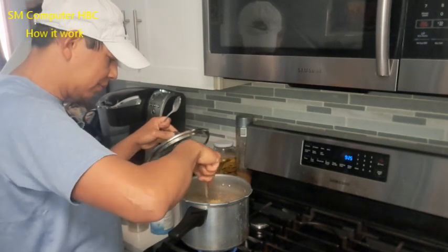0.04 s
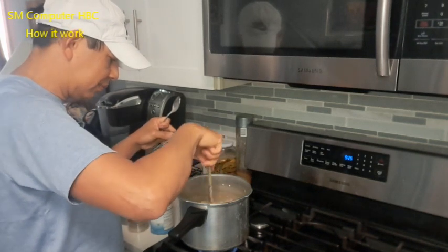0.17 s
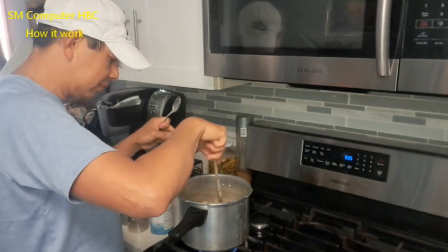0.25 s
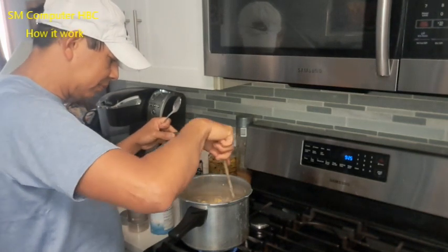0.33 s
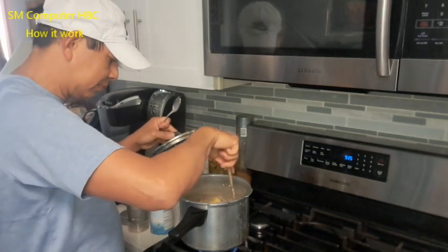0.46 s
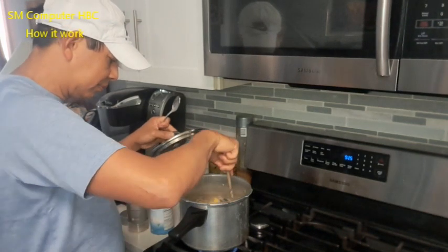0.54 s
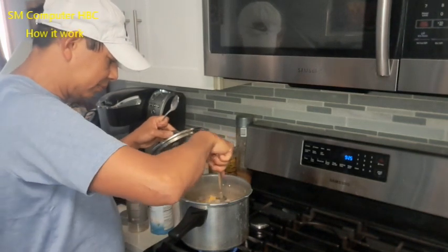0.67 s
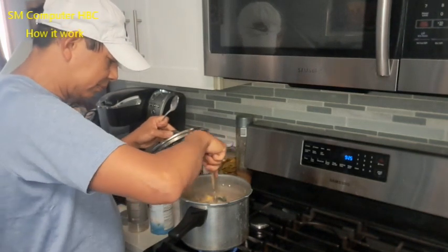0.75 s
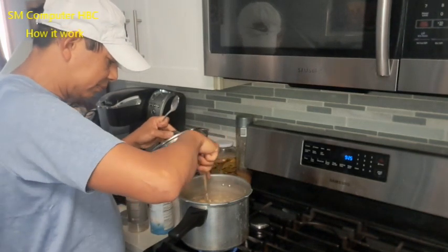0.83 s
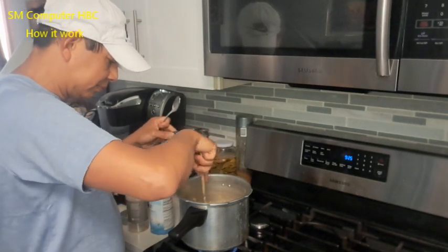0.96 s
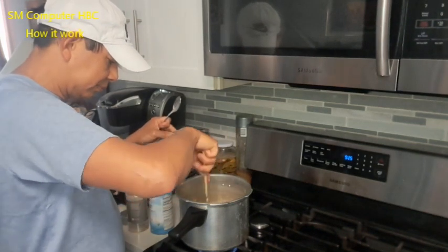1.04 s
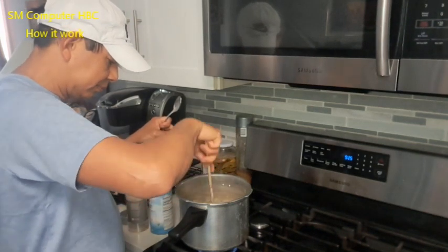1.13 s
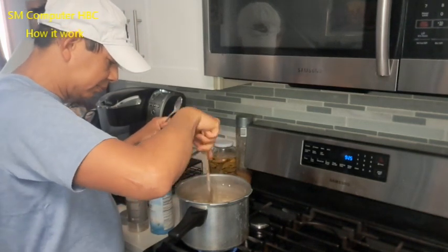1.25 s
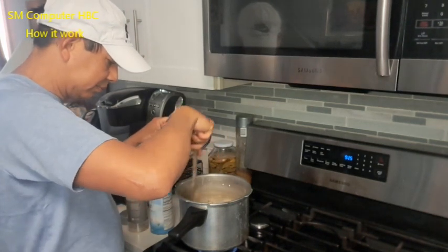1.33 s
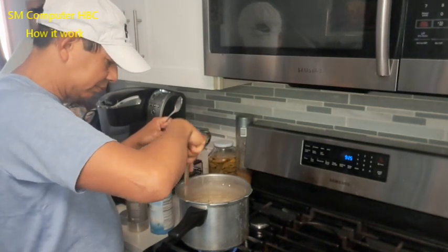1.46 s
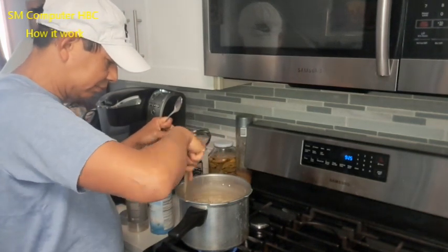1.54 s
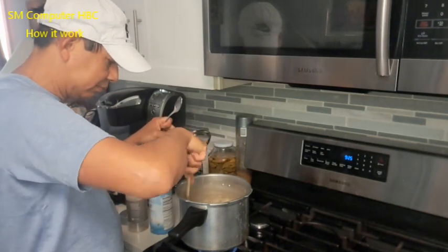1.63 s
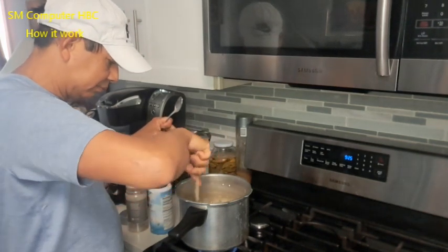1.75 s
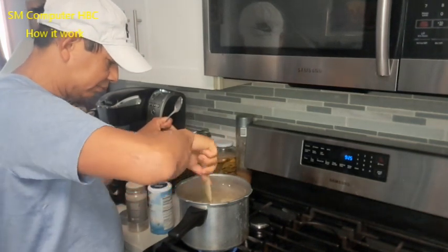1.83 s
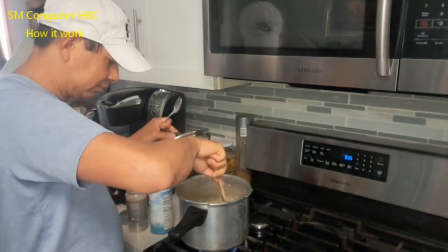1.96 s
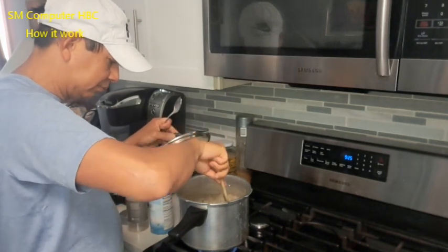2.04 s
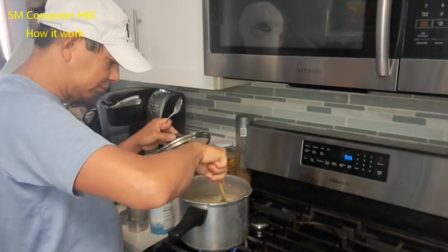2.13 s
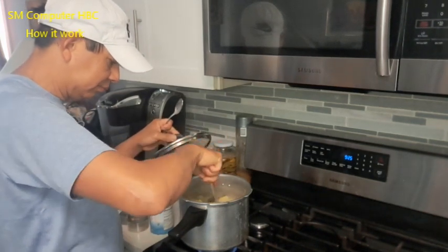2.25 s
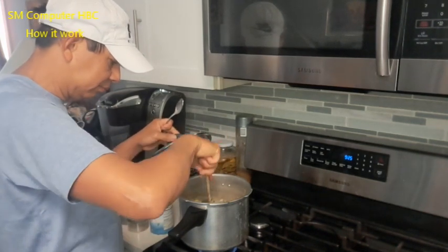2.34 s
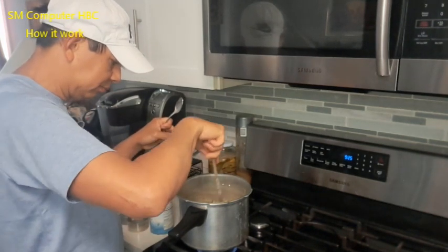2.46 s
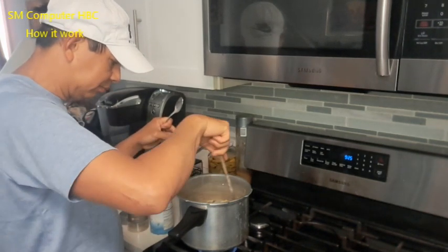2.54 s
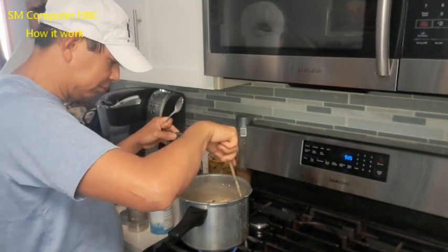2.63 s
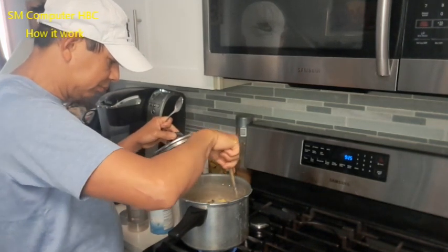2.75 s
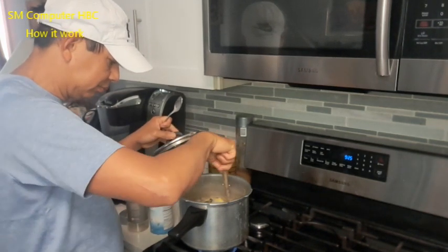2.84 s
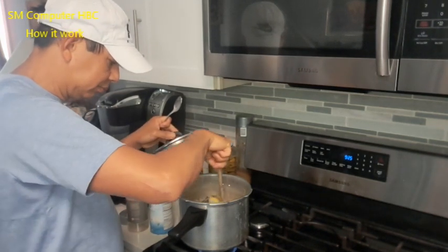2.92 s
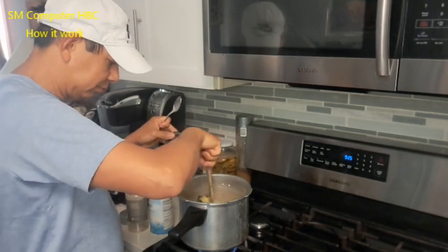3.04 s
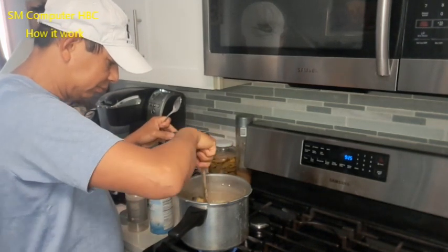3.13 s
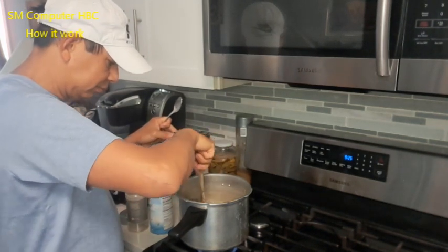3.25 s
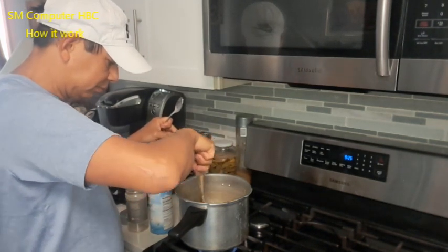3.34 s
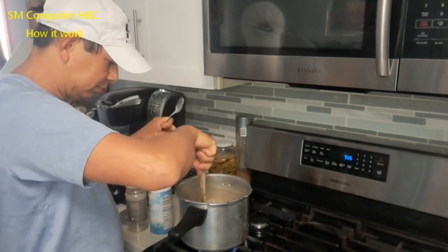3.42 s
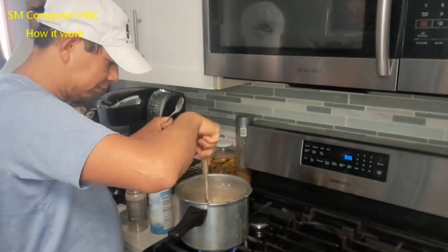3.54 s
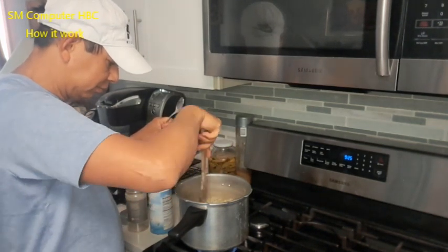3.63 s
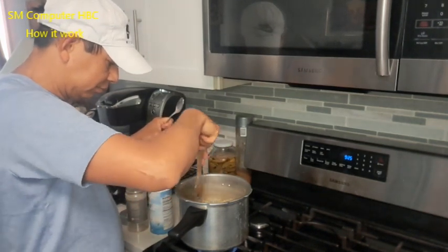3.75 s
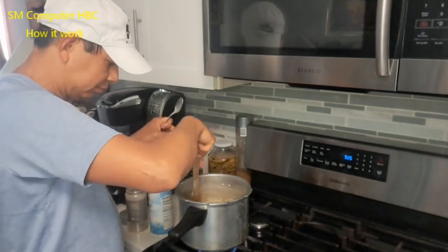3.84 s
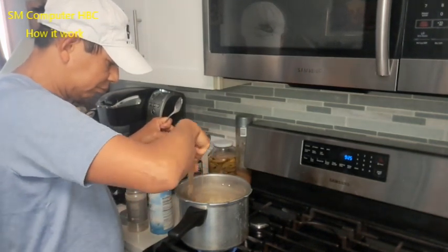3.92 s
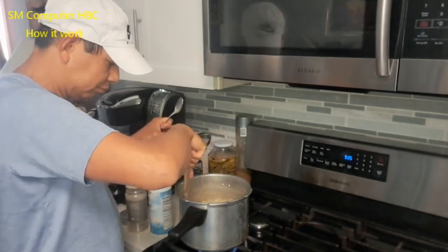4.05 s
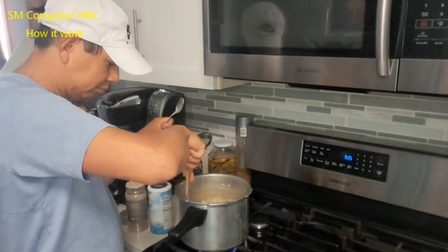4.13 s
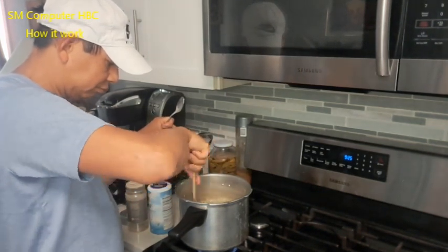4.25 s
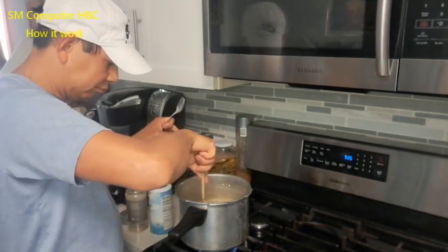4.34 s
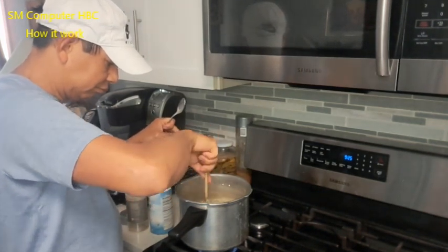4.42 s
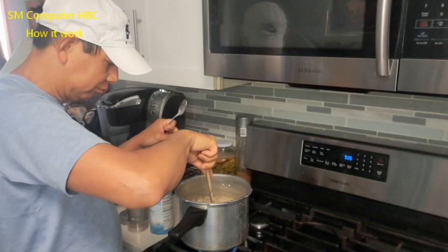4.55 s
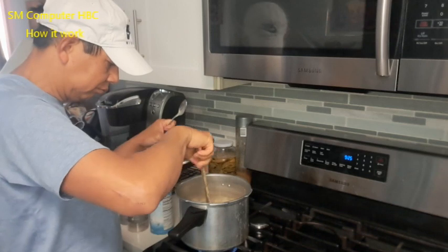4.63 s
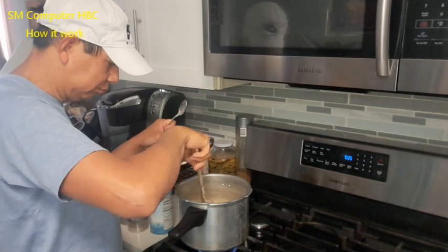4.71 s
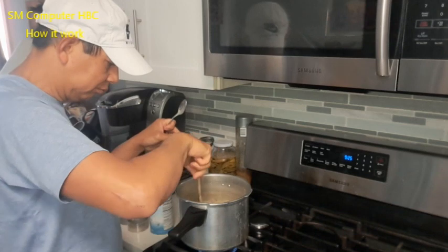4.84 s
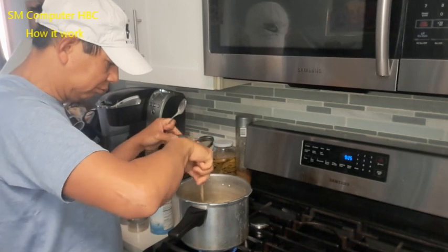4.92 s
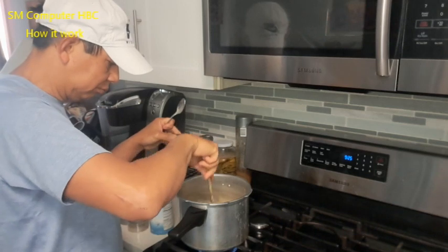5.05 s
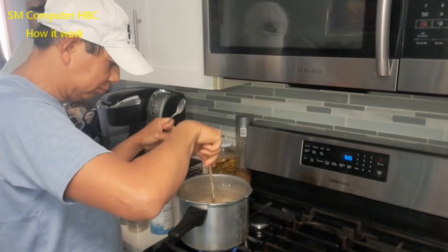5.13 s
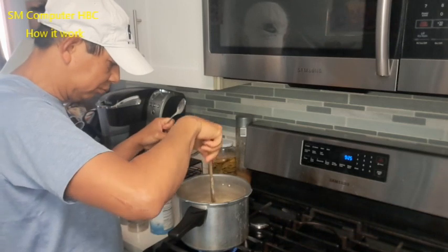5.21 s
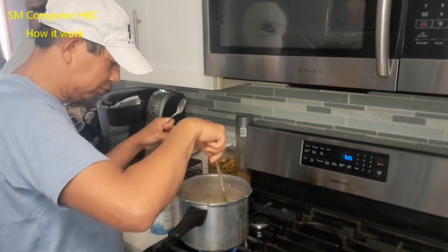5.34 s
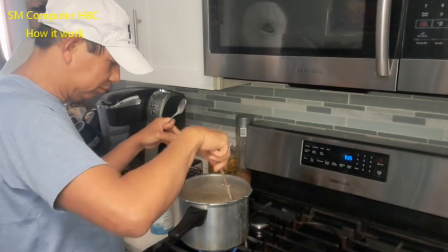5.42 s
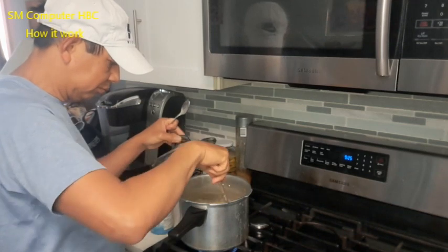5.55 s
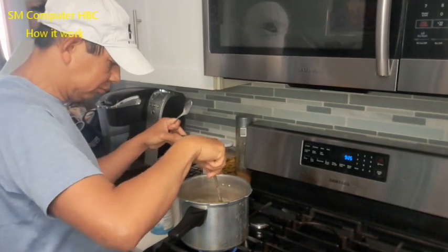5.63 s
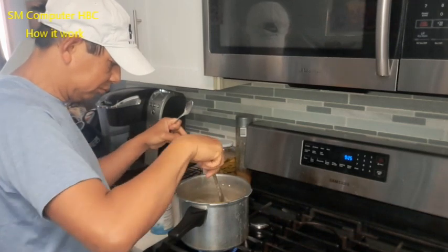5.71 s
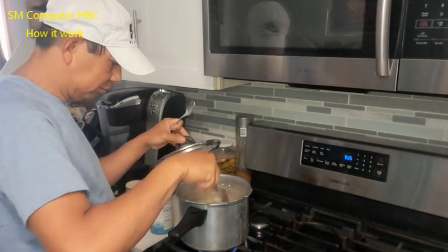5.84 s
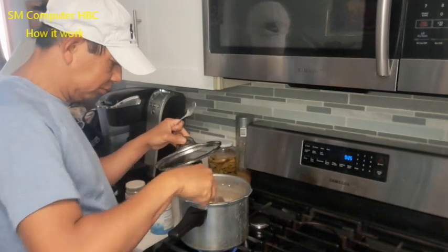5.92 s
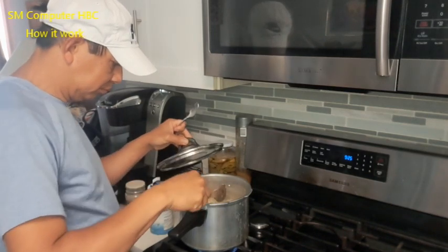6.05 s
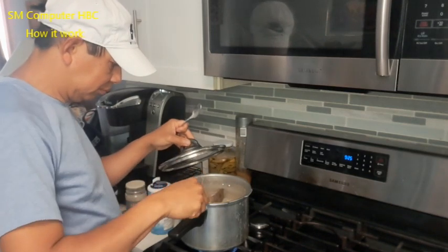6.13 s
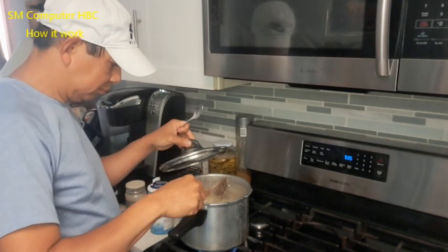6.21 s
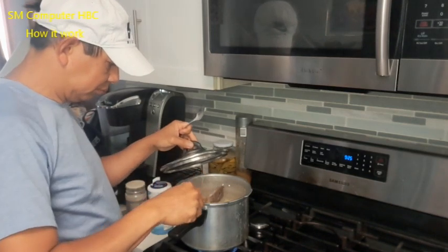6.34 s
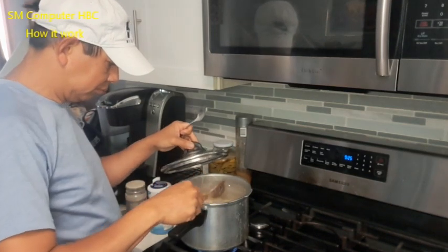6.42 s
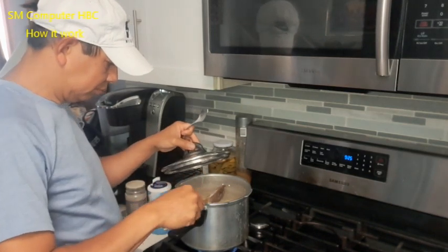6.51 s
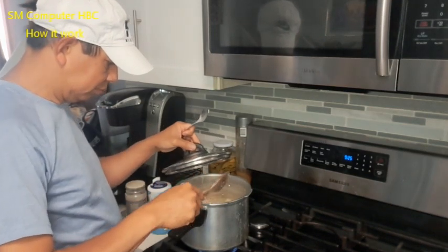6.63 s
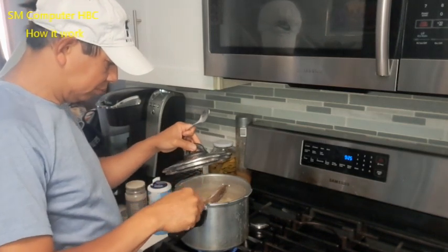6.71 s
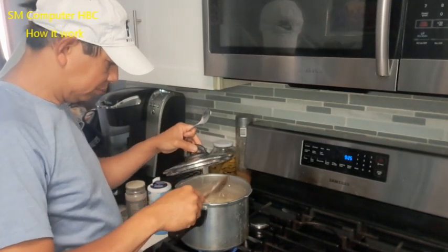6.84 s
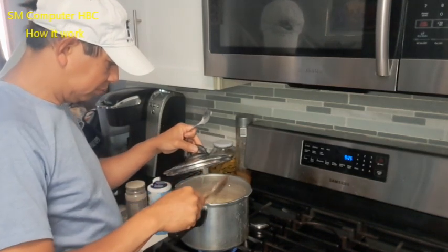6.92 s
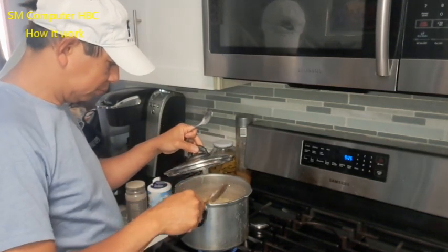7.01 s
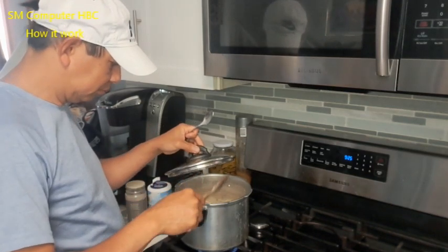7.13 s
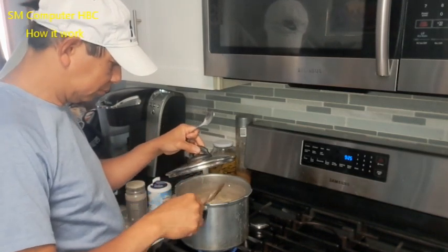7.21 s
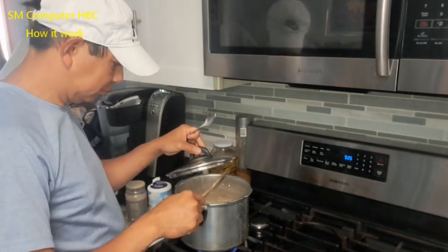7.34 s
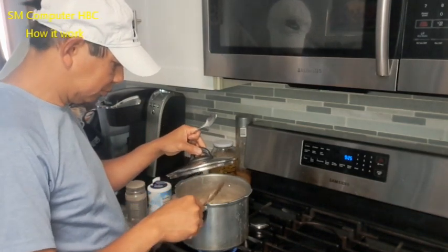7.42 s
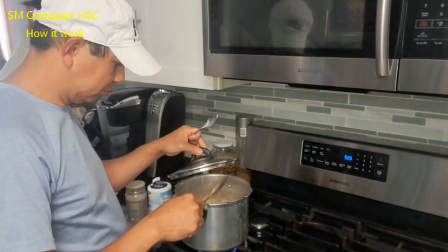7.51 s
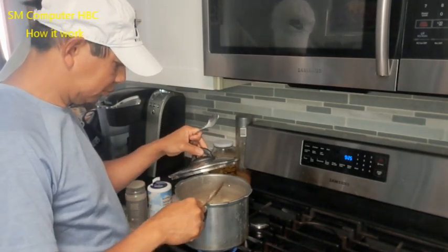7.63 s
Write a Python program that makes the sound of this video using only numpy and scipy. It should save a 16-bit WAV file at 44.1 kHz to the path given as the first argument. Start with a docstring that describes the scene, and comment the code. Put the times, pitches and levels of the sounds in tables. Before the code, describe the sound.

A wooden spoon stirs thick stew in a steel saucepan with soft plops and wet squelches, then knocks the rim in a steady run of hollow booming clacks.

```python
"""Thick stew, stirred with a wooden spoon in a steel saucepan on a gas stove, plops, pops and squelches.
Its air pockets are damped resonators of rising pitch; its clicks and wet smacks are shaped noise.
The spoon drags on the bottom and knocks the rim: decaying modes and noise bursts form boom and clack.
Small-kitchen reflections and steady rumble and hiss surround this; the right channel is inverted."""
import sys
import numpy as np
from scipy import signal
from scipy.fft import rfft, irfft
from scipy.io import wavfile
from scipy.ndimage import uniform_filter1d

SR = 44100
rng = np.random.default_rng(int(sys.argv[2]) if len(sys.argv) > 2 else 0)


def to_wav(sig):
    """Store sig (one row per channel, or 1-D mono) as 16-bit WAV at the path in sys.argv[1].

    Samples outside -1..1 are clipped; the rate is SR.
    """
    pcm = np.clip(np.atleast_2d(sig), -1, 1) * 32767
    pcm = np.round(pcm).astype(np.int16)
    wavfile.write(sys.argv[1], SR, pcm.T)  # frames by channels


N = 338238

# Event and spectrum levels are relative: the sources trim or normalise them.
# large air pockets opening behind the spoon: [t/s, level/dB]
LARGE_POCKETS = [(.277, -30.5), (.411, -31.5), (.651, -33.5), (1.01, -28), (1.218, -32), (1.447, -23.5),
                 (1.481, -26.5), (1.837, -29.5), (2.047, -32.5), (2.351, -30.5), (2.546, -32),
                 (2.969, -25.5), (3.06, -30), (3.21, -33.5), (3.834, -24), (4.016, -27.5), (4.395, -31.5),
                 (4.643, -32), (5.082, -27.5), (5.177, -31), (5.503, -37.5), (5.781, -29), (6.333, -30.5),
                 (6.444, -28), (6.703, -30), (6.743, -25), (7.215, -33)]
# small air pockets bursting at the surface: [t/s, level/dB]
SMALL_POCKETS = [(.052, -42.5), (.183, -44), (.281, -52), (.424, -35.5), (.454, -43), (1.319, -40.5),
                 (1.76, -38.5), (2.022, -39), (2.351, -41.5), (2.974, -39), (3.196, -43), (3.895, -40),
                 (4.425, -34.5), (4.703, -38), (4.957, -41), (5.185, -36.5), (5.628, -40), (6.082, -40),
                 (6.216, -37), (6.348, -43), (6.444, -33), (6.68, -34)]
# tiny bubbles bursting: [t/s, level/dB]
TINY_BUBBLES = [(.186, -37), (1.067, -31), (2.663, -37), (4.817, -37.5), (4.846, -36)]
# air squeezed through the stew: [t/s, level/dB, initial f/Hz, decay time/s]
AIR_SQUEEZES = [(.137, -48, 2250, 0.022), (.455, -50, 2330, 0.014), (1.759, -38.5, 2030, 0.01),
                (1.853, -43, 1980, 0.02), (1.447, -43.5, 2180, 0.013), (2.51, -51, 2060, 0.028),
                (4.423, -38, 1720, 0.0044), (4.582, -47.5, 2800, .017), (5.39, -53.5, 2530, 0.015),
                (6.075, -49.5, 2320, .02), (6.215, -44.5, 1900, .012), (6.448, -45.5, 2130, 0.0086)]
# how hard the spoon works the stew: [t/s, slosh level/dB, wet crackle level/dB]
STIRRING_EFFORT = [(0, -38.5, -50), (.23, -48, -63.5), (.43, -40.5, -54.5), (.56, -50.5, -62.5),
                   (.78, -32.5, -51), (.95, -52, -69.5), (1.08, -42.5, -61.5), (1.74, -42, -53),
                   (1.87, -34, -52), (2.06, -41, -53), (2.2, -40.5, -63.5), (3.15, -46, -60),
                   (3.7, -46.5, -60), (3.95, -43, -51.5), (4.3, -40.5, -58.5), (4.88, -52.5, -66),
                   (5.7, -46, -68.5), (6.2, -45, -60.5)]
# stew tearing from spoon and wall: [t/s, level/dB, band centre f/Hz before wet colouring]
FILM_TEARS = [(0.013, -49, 7500), (.152, -40.5, 5700), (0.747, -41, 3080), (0.79, -36, 8000),
              (1.312, -44, 6500), (1.501, -34, 7250), (1.565, -40.5, 4100), (2.973, -32.5, 6650),
              (3.074, -38.5, 3900), (3.208, -33.5, 3600), (3.208, -37.5, 13000), (3.904, -38, 6600),
              (4.018, -37, 8500), (4.058, -38.5, 3900), (4.168, -40.5, 3970), (4.312, -39.5, 9600),
              (4.424, -41, 4300), (5.974, -42, 8500)]
# spectrum of wet crackle: [f/Hz, level/dB]
WET_SPECTRUM = [(1000, 44), (2400, 12), (3400, 8.5), (4500, 15.5), (6400, 16.5), (7700, 7.5), (11000, 21.5),
                (12500, 15.5), (16000, 16)]
# resonances of the air in the pot: [f/Hz, bandwidth/Hz, level/dB]
POT_AIR = [(333, 123, -1), (573, 80, 4), (808, 210, -7), (1374, 139, 9), (2040, 36, 1)]
# blows of the spoon on the pot: [t/s, thud level/dB, wooden clack level/dB]
BLOWS = [(.757, -23, -47), (.836, -27, -56), (1.443, -26, -44), (3.832, -27.5, -47), (4.293, -25, -58),
         (5.981, -13, -44), (6.161, -8.5, -54), (6.206, -20, -54), (6.383, -12.5, -51), (6.581, -8.5, -46),
         (6.79, -4.5, -32.5), (7.02, -6.5, -34), (7.252, -6.5, -34.5), (7.476, -7, -35)]
# spectrum of the clack: [f/Hz, level/dB]
CLACK_SPECTRUM = [(300, 25), (1300, 8), (2000, 16), (3200, 8), (6500, 10.5), (8000, 1), (11000, 11.5),
                  (16000, -14)]
# modes of the full pot on the stove top: [f/Hz, level/dB, t60/s]
POT_MODES = [(126.1, -19.5, 0.28), (160.2, -17, 0.29), (236.1, 2.5, .15), (248, -18, 0.33),
             (309, 1.5, 0.068), (373, -9.5, 0.15), (450.4, -2.5, .14), (474.3, -6, .17), (550, -16, 0.33),
             (618, -18, 0.34), (736, -22.5, 0.25), (885, -33, .35), (986, -33, .3)]
# spoon rubbing over the bottom: [t/s, length/s, level/dB]
BOTTOM_RUBS = [(1.79, .33, -40), (4.06, .44, -37), (4.95, .2, -43)]
# spectrum of the stove's diffuse shudder after a blow: [f/Hz, level/dB]
SHUDDER_SPECTRUM = [(60, -29), (130, -12), (240, -2), (340, -6.5), (550, -13), (900, -24), (3000, -54)]
# spectrum of the steady rumble and hiss: [f/Hz, level/dB per Hz]
HISS_SPECTRUM = [(20, -2), (55, 15), (100, 11), (550, 17.5), (1000, -0.5), (2600, -31), (4600, -7.5),
                 (6500, -4.5), (7600, -15.5), (11200, -2.5), (12500, -10), (16000, -6.5)]
# reverberation of the kitchen: [f/Hz, t60/s]
KITCHEN_DECAY = [(100, 0.89), (250, 0.54), (600, 0.27), (1500, 0.33), (5000, 0.21), (14000, 0.16)]
# right channel against left: [f/Hz, level/dB, phase lag/rad, likeness 0-1]
RIGHT_CHANNEL = [(60, -11.5, .02, .45), (200, -5.4, .16, .998), (700, -6, .33, .995), (2400, -8, .62, .87),
                 (8100, -17, .72, .6), (11000, -12, .85, .66), (14000, -2.5, .3, .12)]
EDGE_HZ = 15900  # upper limit of the recorder's band


def plops(hz=560, spread_octaves=0.055, cycles=1.23, glide=0.074, spit=0.35, spit_octaves=0.57,
          spit_fall_s=0.014, trim_db=-3, echo_s=0.009295, snap_db=-16, snap_hz=1200, snap_fall_s=0.0025):
    """Damped cavity resonance: a large pocket snaps, rings and spits, and excites the air in the pot."""
    t, out = np.arange(SR // 10) / SR, np.zeros(N)
    for s, db in LARGE_POCKETS:
        pitch = hz * 2 ** (spread_octaves * rng.standard_normal())
        splash = unit(around(rng.standard_normal(len(t)), pitch, spit_octaves))
        plop = ping(pitch, cycles, glide) + spit * burst(splash, cycles / pitch, spit_fall_s)
        click = around(rng.standard_normal(len(t)), snap_hz, 0.97) * np.exp(-t / snap_fall_s)
        snap = hollow(click)
        add(out, s, at_level(plop, db + trim_db) + at_level(snap, db + snap_db))
        # the pot's hollow, thrown back by the wall
        add(out, s + echo_s, at_level(hollow(plop), db + trim_db))
    return out


def pops(hz=1330, spread_octaves=0.092, cycles=1.94, glide=0.14, spit=0.37, spit_octaves=0.54,
         spit_fall_s=0.005, ring_db=-7):
    """Resonance by size: a small pocket bursts with a short rising pip near the hollow's upper pitch."""
    out = np.zeros(N)
    for s, db in SMALL_POCKETS:
        pitch = hz * 2 ** (spread_octaves * rng.standard_normal())
        splash = unit(around(rng.standard_normal(SR // 10), pitch, spit_octaves))
        pop = ping(pitch, cycles, glide) + spit * burst(splash, cycles / pitch, spit_fall_s)
        add(out, s, at_level(pop + amp(ring_db) * hollow(pop), db))
    return out


def ping(hz, cycles, glide, phase=0):
    """Damped oscillation with rising frequency: one air pocket rings for a few cycles."""
    age = np.arange(SR // 10) / SR * hz / cycles
    pitch = hz * (1 + glide * np.tanh(age / 2 - 1))
    return np.sin(2 * np.pi * np.cumsum(pitch) / SR + phase) * age ** 2 * np.exp(-age)


def ticks(fall_s=0.00035, hz=11000):
    """Impulsive excitation: a tiny bubble bursts in one sharp, high click."""
    out = np.zeros(N)
    for s, db in TINY_BUBBLES:
        click = around(rng.standard_normal(SR // 10), hz, 0.34)
        decay = np.exp(-np.arange(len(click)) / SR / fall_s)
        add(out, s, at_level(click * decay, db, size=64))
    return out


def squelches(rise_s=0.00025, octaves=0.27, spread=0.98, sag_octaves_per_s=2.5):
    """Flow through a widening gap: squeezed air gives a run of tiny clicks of sinking pitch."""
    t, out = np.arange(SR // 3) / SR, np.zeros(N)
    for s, db, hz, fall_s in AIR_SQUEEZES:
        noise, size = rng.standard_normal((2, len(t)))
        clicks = around(noise * np.exp(spread * np.clip(size, -2, 2)), hz, octaves)
        slowing_time = np.cumsum(2 ** (-sag_octaves_per_s * t)) / SR
        sinking = np.interp(slowing_time, t, clicks)
        add(out, s, at_level(burst(sinking, rise_s, fall_s), db, size=512))
    return out


def squeak(s=3.555, length_s=.065, hz=2530, db=-62):
    """Orifice tone: air whistles faintly through a pinhole in the stew."""
    t, out = np.arange(round(length_s * SR)) / SR, np.zeros(N)
    add(out, s, amp(db) * np.sin(np.pi * t / length_s) * np.sin(2 * np.pi * hz * t))
    return out


def stirring(slosh_db=-1.5, gurgle_db=-6.0, crackle_db=-1):
    """Superposed random pulses: big soft pops in the pot's hollow, smaller gurgles and fine crackle."""
    slosh, wet = amp(effort(np.arange(N) / SR))
    churn = hollow(swarm(210, 1022, per_s=150, cycles=0.6, spread_db=2.3, clump_db=3.5))
    gurgle = swarm(950, 3400, per_s=450, cycles=1.6, spread_db=3, clump_db=3)
    pulses = swarm(2500, 14600, per_s=1500, cycles=1.2, spread_db=4.5, clump_db=4)
    crackle = colour(pulses, WET_SPECTRUM)
    tearing = wet * (slosh / wet) ** 0.19  # gurgles come mostly when the stew tears open
    out = amp(slosh_db) * slosh * unit(churn)
    out += amp(gurgle_db) * tearing * unit(gurgle)
    return out + amp(crackle_db) * wet * unit(crackle)


def swarm(low_hz, high_hz, per_s, cycles, spread_db, clump_db, count=36):
    """Random pulse trains: pockets of many sizes open in clumps, most of them faintly."""
    out, knots = np.zeros(N), np.arange(0, N + SR // 30, SR // 30)
    for hz in np.geomspace(low_hz, min(high_hz, SR / 3), count):
        height = amp(spread_db * np.minimum(rng.exponential(1, N), 3.5))
        train = height * (rng.random(N) < per_s / count / SR)
        pocket = unit(ping(hz, cycles, 0.046, 2 * np.pi * rng.random()))
        out += signal.oaconvolve(train, pocket)[:N]
    clumping = np.interp(np.arange(N), knots, rng.standard_normal(len(knots)))
    return out * amp(clump_db * clumping)


def effort(s):
    """Drive of the stirring: levels/dB of slosh and wet crackle, interpolated at the times s."""
    at, *columns = np.transpose(STIRRING_EFFORT)
    return [np.interp(s, at, c) for c in columns]


def smacks(rise_s=0.0008, fall_s=0.011, spread=0.68, octaves=1.0, trim_db=0):
    """Film rupture: a quick clump of tiny clicks, from low narrow squelch to high wide spatter."""
    out = np.zeros(N)
    for s, db, hz in FILM_TEARS:
        noise, size = rng.standard_normal((2, SR // 10))
        clicks = around(noise * np.exp(spread * size), hz, octaves * np.sqrt(hz / 7000))
        smack = burst(colour(clicks, WET_SPECTRUM), rise_s, fall_s)
        add(out, s, at_level(smack, db + trim_db, size=128))
    return out


def hollow(x):
    """Cavity resonance: the air above the stew rings at a few fixed pitches."""
    return sum(amp(db) * signal.lfilter(*signal.iirpeak(hz, hz / width, SR), x)
               for hz, width, db in POT_AIR)


def clacks(rise_s=0.0036, fall_s=0.019, trim_db=2, wood_hz=1150, wood_fall_s=0.0042, wood_db=-24):
    """Contact noise: wood knocks hollowly on every blow; hard blows on the bare rim clack brightly."""
    out = np.zeros(N)
    for s, thud_db, clack_db in BLOWS:
        rim, wood = rng.standard_normal((2, SR // 5))
        clack = burst(colour(rim, CLACK_SPECTRUM), rise_s, fall_s)
        knock = burst(around(wood, wood_hz, 0.35), rise_s, wood_fall_s)
        add(out, s, at_level(clack, clack_db + trim_db))
        add(out, s, at_level(knock, thud_db + wood_db))
    return out


def thuds(rise_s=0.0093, first=0.17, detune=0.028, place_db=-1.5, softness=0.27, trim_db=-5.0):
    """Modal excitation: each blow swells into modes of pot and stove top, which the stew soon damps."""
    t, out = np.arange(SR // 2) / SR, np.zeros(N)
    hz, db, t60 = np.transpose(POT_MODES)[:, :, None]
    # a small prompt share, then the main swell
    swell = first * (1 - np.exp(-t / .001)) + (1 - first) * (1 - np.exp(-(t / rise_s) ** 4))
    decay = amp(-60 * t / t60)
    phase, hardest_db = rng.random(hz.shape), np.max(BLOWS, axis=0)[2]
    for s, thud_db, clack_db in BLOWS:
        # each lands elsewhere, and the stew shifts
        place, load, turn = rng.standard_normal((3, *hz.shape))
        # soft blows miss the high modes
        dull_db = softness * (clack_db - hardest_db) * np.log2(np.maximum(hz / 240, 1))
        level = amp(db + place_db * place + dull_db)
        tone = np.sin(2 * np.pi * (hz * (1 + detune * load) * t + phase + 0.11 * turn))
        modes = level * decay * tone
        add(out, s, at_level(swell * modes.sum(0), thud_db + trim_db, size=1400))
    return out


def drags(bandwidth_hz=24):
    """Friction excitation: rubbing noise makes the pot murmur, with weight on its long-ringing modes."""
    out = np.zeros(N)
    for s, length_s, db in BOTTOM_RUBS:
        slips = rng.standard_normal(round(length_s * SR))
        murmur = sum(amp(mode_db) * t60 * signal.lfilter(*signal.iirpeak(hz, hz / bandwidth_hz, SR), slips)
                     for hz, mode_db, t60 in POT_MODES)
        murmur = unit(around(murmur, POT_MODES[2][0], 0.58))
        add(out, s, amp(db) * murmur * np.sqrt(np.hanning(len(slips))))
    return out


def shudders(rise_s=.012, fall_s=.055, trim_db=-14.7):
    """Diffuse structural vibration: the blow spreads through the grate and the stove's panels."""
    out = np.zeros(N)
    for s, thud_db, _ in BLOWS:
        panels = colour(rng.standard_normal(SR // 2), SHUDDER_SPECTRUM)
        add(out, s, at_level(burst(panels, rise_s, fall_s), thud_db + trim_db, size=3000))
    return out


def rocking(s=.74):
    """Rigid-body motion: the shoved pot rumbles briefly on its grate and sways deeply after each blow."""
    out = np.zeros(N)
    add(out, s, rumble(length_s=0.1, hz=90, db=-33.5))
    for at, thud_db, _ in BLOWS:
        add(out, at, rumble(length_s=.19, hz=41, db=thud_db - 33))
    return out


def rumble(length_s, hz, db):
    """Band-limited random vibration: a low noise swells and dies."""
    noise = around(rng.standard_normal(round(length_s * SR)), hz, 1.0)
    return amp(db) * unit(noise) * np.hanning(len(noise))


def background(db=-45.5):
    """Stationary noise: steady rumble and hiss of fixed spectrum."""
    return amp(db) * unit(colour(rng.standard_normal(N), HISS_SPECTRUM))


def kitchen(x, wet_db, gap_s=0.0083):
    """Reverberation: direct sound plus dense reflections that die band by band."""
    hz, t, z = signal.stft(rng.standard_normal(SR // 2), SR, nperseg=256)
    decay = amp(-60 * t / read(KITCHEN_DECAY, hz)[:, None])
    tail = signal.istft(z * decay, SR, nperseg=256)[1]
    tail *= np.arange(len(tail)) > gap_s * SR
    return x + amp(wet_db) * signal.fftconvolve(x, tail / np.linalg.norm(tail))[:N]


def port_pair(left):
    """Interchannel coherence: the right is inverted, weaker, phase-lagged and partly scattered by band."""
    hz, _, z = signal.stft(left, SR, nperseg=1024)
    table = np.array(RIGHT_CHANNEL)
    level_db, lag, alike = (read(table[:, [0, k]], hz)[:, None] for k in (1, 2, 3))
    alike = np.clip(alike, 0, 1)
    scatter = np.exp(2j * np.pi * rng.random(z.shape))
    transfer = alike * np.exp(-1j * lag) + np.sqrt(2 * (1 - alike ** 2)) * scatter
    right = -z * amp(level_db) * transfer
    return np.array([left, signal.istft(right, SR, nperseg=1024)[1][:N]])


def amp(db):
    """Level definition: converts dB to an amplitude ratio."""
    return 10 ** (np.asarray(db) / 20)


def unit(x):
    """Effective value: scales x to an RMS of one."""
    return x / np.sqrt(np.mean(x ** 2) + 1e-20)


def read(points, hz):
    """Logarithmic frequency scale: interpolates rows [f/Hz, value] along it."""
    f, value = np.transpose(points)
    return np.interp(np.log(hz + 1), np.log(f), value)


def add(mix, s, sound):
    """Superposition: adds a sound to the mix from time s on."""
    part = mix[max(round(s * SR), 0):][:len(sound)]
    part += sound[:len(part)]


def colour(x, points):
    """Linear filtering: weights the spectrum of x by rows [f/Hz, level/dB]."""
    return irfft(rfft(x) * amp(read(points, np.fft.rfftfreq(len(x), 1 / SR))), len(x))


def around(x, hz, octaves):
    """Band-pass filtering: keeps a bell-shaped band of x on an octave scale."""
    f = np.fft.rfftfreq(len(x), 1 / SR) + 1
    return irfft(rfft(x) * np.exp(-.5 * (np.log2(f / hz) / octaves) ** 2), len(x))


def burst(noise, rise_s, fall_s):
    """Exponential transient: gives a noise a quick start and a dying tail."""
    t = np.arange(len(noise)) / SR
    return noise * (1 - np.exp(-t / rise_s)) * np.exp(-t / fall_s)


def at_level(x, db, size=256):
    """Short-time level: scales x so that its loudest window of size samples has this RMS level."""
    return x * amp(db) / np.sqrt(uniform_filter1d(x ** 2, size).max())


def scene():
    """Superposition of stew, spoon, stove and background, heard in two channels."""
    pockets = kitchen(plops() + pops() + ticks(), wet_db=-7.5)
    stew = pockets + kitchen(squelches() + squeak() + stirring(), wet_db=-2)
    spoon = kitchen(clacks() + smacks(), wet_db=-1.5)
    stove = kitchen(thuds() + drags(), wet_db=-22.5, gap_s=0.05) + shudders() + rocking()
    return port_pair(stew + spoon + stove + background())


def record(dry):
    """Saturation and low-pass filtering: rounds off the tallest peaks, then limits the band."""
    rounded = dry / (1 + (dry / .85) ** 6) ** (1 / 6)
    low_pass = signal.firwin(511, EDGE_HZ, window=("kaiser", 9), fs=SR)
    return signal.oaconvolve(rounded, low_pass[None], "same")


dry = scene()
out = record(dry)
to_wav(out)
```